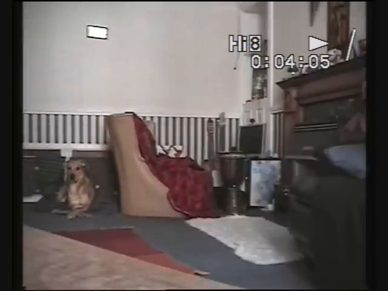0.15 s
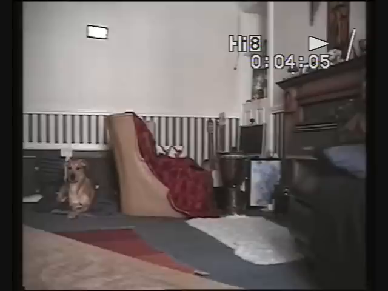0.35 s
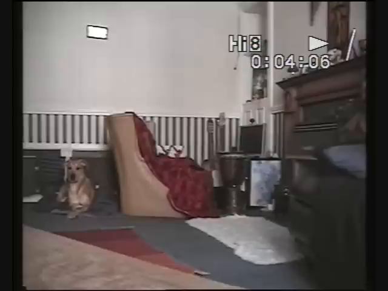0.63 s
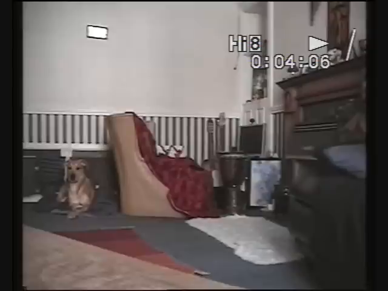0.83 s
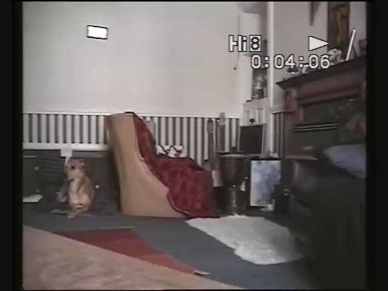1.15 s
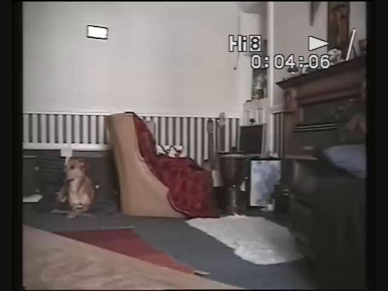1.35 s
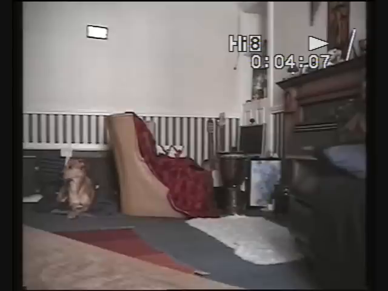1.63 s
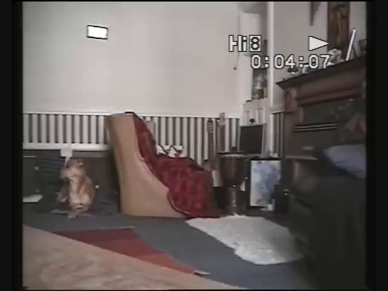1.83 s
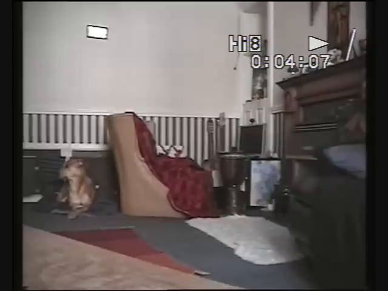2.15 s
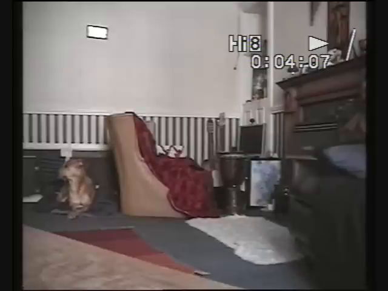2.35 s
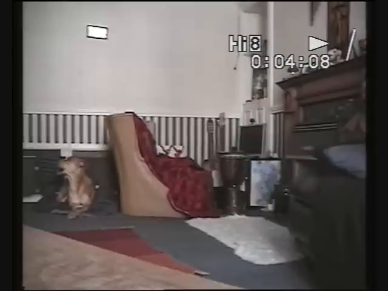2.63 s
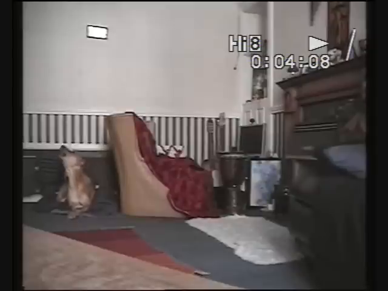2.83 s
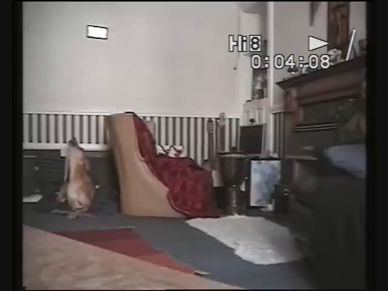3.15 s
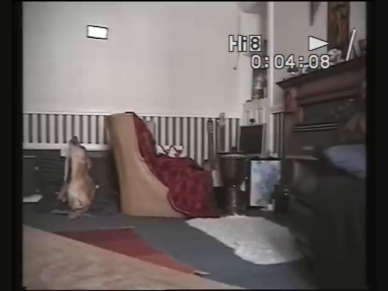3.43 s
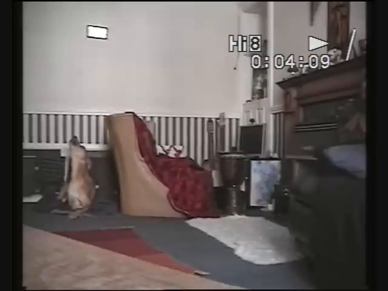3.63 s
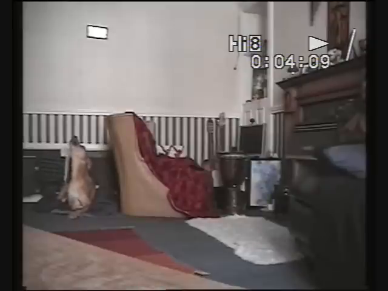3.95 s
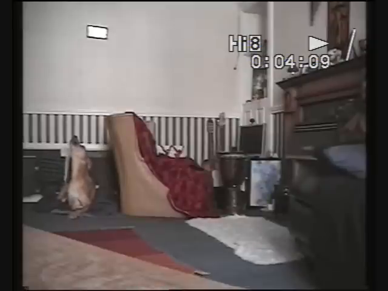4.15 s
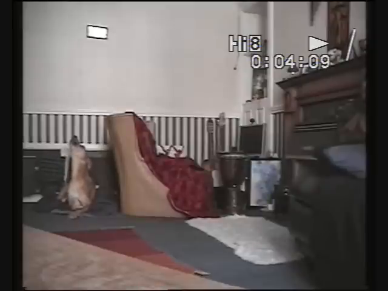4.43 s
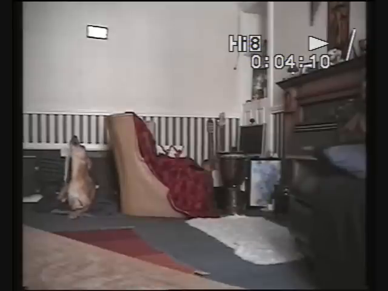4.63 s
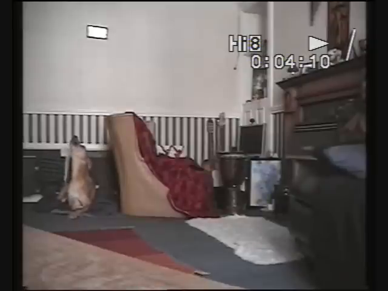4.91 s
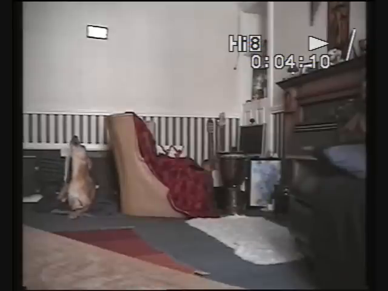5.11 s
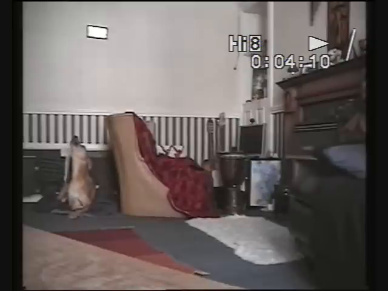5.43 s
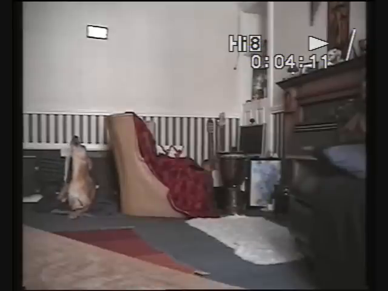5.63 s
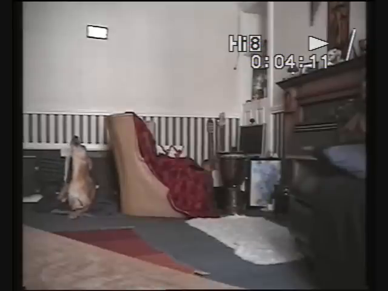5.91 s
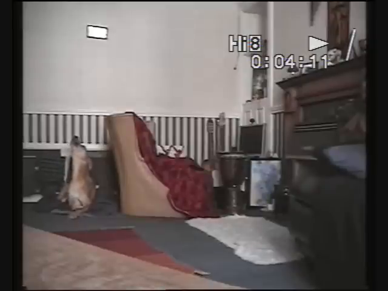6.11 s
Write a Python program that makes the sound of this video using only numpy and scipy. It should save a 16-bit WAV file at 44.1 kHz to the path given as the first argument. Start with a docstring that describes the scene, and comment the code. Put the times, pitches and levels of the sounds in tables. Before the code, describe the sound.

Two dogs howl together in a room after a few small whimpers, one wavering and swooping, the other holding a long sinking note.

```python
"""Two dogs howl together in a living room, picked up by the one microphone of a tape camcorder.
One whistles through its nose, yips and whimpers, then sings a low wavering howl that swoops and falls.
The other joins with a growl that rises to one long, slowly sinking note. Each voice is vocal folds and
breath, coloured by throat and muzzle. Behind them are faint ticks and the room's reflections.
The loudest swoops overload the tape; all sits on the right channel, over hiss and a high whine."""
import sys
import numpy as np
from scipy import signal
from scipy.fft import rfft, irfft, next_fast_len
from scipy.io import wavfile
from scipy.ndimage import uniform_filter1d

SR = 44100
rng = np.random.default_rng(int(sys.argv[2]) if len(sys.argv) > 2 else 0)


def waveform_to_disk(signal):
    """Save audio, clipped to [-1, 1], as 16-bit WAV at the path in sys.argv[1]."""
    frames = np.transpose(np.atleast_2d(signal))
    scaled = np.clip(frames, -1, 1) * 32767
    samples = np.round(scaled).astype(np.int16)
    wavfile.write(sys.argv[1], SR, samples)


N = 276811
TIME = np.arange(N) / SR

# the howls; brightness lifts the low overtones as the mouth opens:
# (time [s], pitch [Hz], effort [dB], brightness [dB])
WAVERING_HOWL = [(1.915, 326.3, -49, -9), (1.995, 337.8, -26.5, -1.5), (2.04, 316.8, -38, -1.5),
                 (2.09, 307.5, -15.5, -13.5), (2.15, 312.4, -18, -10.5), (2.2, 320.2, -20, -24.5),
                 (2.29, 322.7, -13, -15), (2.5, 324.6, -23, -6.5), (2.56, 349.8, -28, 5.5),
                 (2.62, 343.4, -26.5, -6), (2.68, 361.4, -21, -2.5), (2.76, 382.9, -30, 4),
                 (2.87, 399, -27.5, 9.5), (2.92, 374.5, -19.5, -7), (3.03, 344.5, -29.5, -20),
                 (3.1, 344.1, -14.5, -11.5), (3.42, 341.3, -15.5, -23), (3.49, 360.6, -26, 3),
                 (3.61, 424.7, -20, -1.5), (3.7, 456.6, -40.5, 0.5), (3.87, 515.5, -38, 27),
                 (3.94, 560, -27.5, -14), (4.0, 591.2, -26, -9.5), (4.15, 580.4, -29.5, 3),
                 (4.32, 595, -26, -1), (4.42, 576.3, -30.5, 16.5), (4.48, 537, -22.5, 1.5),
                 (4.57, 450.5, -21.5, 11.5), (4.7, 371.8, -23.5, -16), (4.92, 350.8, -36, -5),
                 (5.0, 384, -31, -9.5), (5.07, 363.6, -37, -3.5), (5.12, 360, -55, -10.5)]
LONG_HOWL = [(2.59, 269.4, -46, 2.5), (2.65, 257.2, -32, 1), (2.74, 248.0, -35.5, 4.5),
             (2.82, 299.0, -27.5, 0.5), (2.89, 369.5, -25.0, 7.5), (2.98, 517, -21.0, 5),
             (3.06, 506.3, -17, -2), (3.2, 510.4, -21, 4.5), (3.55, 509.8, -16.5, -5.5),
             (3.9, 491.6, -15.5, -8), (4.08, 481.9, -21.5, 0), (4.42, 468.5, -22.5, 6.5),
             (4.62, 463.2, -20, 0), (5.05, 448.2, -28.5, 8), (5.42, 449.9, -27.0, 4.5),
             (5.55, 440.7, -34, 12), (5.82, 440.5, -34, 12.5), (6.03, 423.1, -38, 9.5),
             (6.28, 394.6, -40, 13.5)]
# how far each of the first four harmonics follows the brightness: (share [ratio])
BRIGHT_SHARES = [0, 1, 0.73, 0.73]
# each dog's mouth and place in the room colour those four at the microphone: (frequency [Hz], gain [dB])
WAVERING_COLOUR = [(300.0, -30), (345.0, -15.0), (375.0, -9.5), (410.0, -3), (480.0, 2), (540.0, -2.5),
                   (650.0, 2.5), (690.0, -3), (730.0, 2), (830.0, -11.5), (1030.0, -17.5), (1130.0, -11.5),
                   (1290.0, -25), (1430.0, -30.5), (2300.0, -43.5)]
LONG_COLOUR = [(250.0, -15.5), (370.0, 1), (410.0, -3.5), (460.0, -4.5), (500.0, -12), (560.0, -18),
               (900.0, -32), (1030.0, -18), (1350.0, -32), (1550.0, -32.5), (2050.0, -44.5)]
# throat and muzzle above the fourth harmonic: (frequency [Hz], gain [dB])
WAVERING_THROAT = [(1600, -7), (1950, 3), (2250, -11), (2550, -18.5), (2920, -1), (3350, -25.5),
                   (4200, -28.5), (4900, -24.5), (5300, -8), (5900, -21), (6650, -11), (7300, -30),
                   (8100, -20), (9500, -40)]
LONG_THROAT = [(1500, 5), (2300, -10.5), (2600, 0), (2850, -3.5), (3130, 4.5), (3700, -23.5), (4600, -36.5),
               (5300, -27), (5800, -31), (6400, -24.5), (7250, -23.5), (7800, -10.5), (8400, -31.5),
               (11500, -30.5)]
# the treble, all harmonics above the fourth together: (time [s], level [dB])
WAVERING_TREBLE = [(1.92, -75), (1.99, -67.5), (2.089, -58.5), (2.249, -54.5), (2.45, -58), (2.619, -70),
                   (2.849, -60), (3.55, -62.5), (3.7, -70), (4.0, -70), (4.301, -62), (4.7, -59),
                   (4.93, -68.5), (5.12, -72.5)]
LONG_TREBLE = [(2.59, -73), (2.852, -71.5), (2.98, -49.5), (3.1, -54.5), (3.6, -54.5), (3.9, -63.5),
               (4.42, -59.5), (5.1, -67), (5.849, -70.5), (6.02, -61.5), (6.1, -77), (6.28, -81)]
# the jaw opens wide in two big swoops: (middle [s], half length [s], resonance [Hz], gain [dB])
YELPS = [(3.61, 0.059, 1307, 19), (4.53, 0.073, 1691, 26)]
# the long howl cracks, its folds repeating only every fourth cycle: (pitch multiple [ratio], gain [dB])
CRACK_LINES = [(.25, -26), (.75, 2.5), (1.25, 4.5), (1.5, -12.5), (1.75, -13), (2.25, -14.5), (2.5, -18)]
# the falling whimper: (time [s], pitch [Hz], effort [dB])
WHIMPER = [(1.21, 582, -69), (1.25, 600, -46), (1.29, 667, -54.5), (1.33, 565.7, -35),
           (1.405, 541.3, -42.5), (1.43, 538.7, -36), (1.49, 526.7, -32), (1.54, 527.7, -41),
           (1.59, 461, -32.5), (1.65, 405, -28), (1.72, 421, -50)]
# two short yips: (start [s], length [s], middle pitch [Hz], peak effort [dB])
YIPS = [(0.642, 0.11, 441, -41.5), (1.031, 0.067, 428, -38)]
# thin nose whistles: (start [s], length [s], top pitch [Hz], level [dB])
WHISTLES = [(0.297, .22, 3760, -77), (1.103, 0.26, 3670, -71.5)]
# faint ticks in the room: (time [s], level [dB])
TICKS = [(0.089, -56), (.425, -59.5), (0.592, -60), (.735, -54.5), (.925, -55), (.959, -59), (1.093, -53),
         (1.266, -49.5)]
# spectrum of a tick: (frequency [Hz], gain [dB])
TICK_COLOUR = [(300, -8), (900, -1), (1600, 6), (3000, -14), (7000, -12), (11000, -34)]
# the living room's ring: (frequency [Hz], time to fall 60 dB [s])
ROOM_DECAY = [(150, 0.058), (450, 0.51), (1000, 0.35), (8000, 0.15)]
# spectrum of the tape hiss: (frequency [Hz], gain [dB])
HISS_COLOUR = [(15, -10), (40, 1), (75, -7.5), (220, -6), (500, -11.5), (1500, -16.5), (2000, -18),
               (4200, -25.5), (5200, -23.5), (7500, -24), (9500, -30)]


def wavering_howl():
    """The first dog's howl: a brief rasp, then a wavering note with two open-jawed swoops."""
    out = np.zeros(N)
    t, *controls = howl_controls(WAVERING_HOWL, WAVERING_TREBLE, rasp_s=.072)
    _, sound = voice(t, *controls, WAVERING_COLOUR, WAVERING_THROAT,
                     jitter=.0045, flutter_hz=120, air_db=-13, yelps=YELPS)
    add(out, t[0], sound)
    return out


def long_howl(crack_at_s=3.0, crack_length_s=.45, crack_db=-28.5, fall_db_per_s=34):
    """The second dog's growl rises to a held note, which cracks into subharmonics, then runs clean."""
    out = np.zeros(N)
    t, *controls = howl_controls(LONG_HOWL, LONG_TREBLE, rasp_s=.17)
    cycles, sound = voice(t, *controls, LONG_COLOUR, LONG_THROAT, jitter=.003, flutter_hz=90, air_db=-9)
    crack = sum(amp(db) * np.cos(2 * np.pi * (k * cycles + rng.random())) for k, db in CRACK_LINES)
    age = np.clip(t - crack_at_s, 0, crack_length_s)
    envelope = amp(crack_db - fall_db_per_s * age) * fade(age, edge_s=.047) ** 2
    flicker = 1 + .12 * wander(len(t), 35)
    add(out, t[0], sound + np.sqrt(2) * crack * envelope * flicker)
    return out


def howl_controls(rows, treble, rasp_s):
    """Time, pitch, effort, brightness, treble and roughness: folds rasp at the onset and in glides."""
    t, (hz, effort_db, bright_db) = curves(rows)
    treble_db = np.interp(t, *np.transpose(treble))
    octaves_per_s = uniform_filter1d(abs(np.gradient(np.log2(hz))) * SR, size=1500)
    unsettled = 1 / (1 + ((t - t[0]) / rasp_s) ** 5)
    rough = np.clip(.025 + .85 * unsettled + .026 * octaves_per_s, 0, 1)
    return t, hz, effort_db, bright_db, treble_db, rough


def voice(t, hz, effort_db, bright_db, treble_db, rough, colour, throat,
          jitter, flutter_hz, air_db, yelps=()):
    """Vocal folds as a stack of harmonics, with breath; returns the count of cycles and the sound."""
    gains = [amp(effort_db + read(colour, k * hz) + bright_db * share + yelp_db(t, k * hz, yelps))
             for k, share in enumerate(BRIGHT_SHARES, 1)]
    # the pitch wavers slightly, and shakes when the voice is hoarse
    tremble = jitter * wander(len(t), 20.6) + .035 * rough * wander(len(t), 90)
    cycles = np.cumsum(hz * (1 + tremble)) / SR
    treble = [amp(read(throat, k * hz)) * (k * hz < 12000) for k in range(5, 29)]
    treble_gain = amp(treble_db) / np.sqrt(sum(g ** 2 for g in treble))
    # the short waves of the high harmonics swell and fade at the microphone as the head moves
    gains += [g * treble_gain * amp(2 * wander(len(t), 28)) for g in treble]
    folds = sum(g * np.cos(2 * np.pi * (k * cycles + rng.random())) for k, g in enumerate(gains, 1))
    # uneven cycles spread each harmonic into a band
    folds = np.sqrt(2) * folds * (1 + rough * wander(len(t), flutter_hz)) / np.sqrt(1 + rough ** 2)
    # air escapes in a puff each cycle and passes the same throat
    puffs = rng.standard_normal(len(t)) * (1 + np.cos(2 * np.pi * cycles))
    air = coloured(puffs, [(200, -24.5), (600, -11.5)] + throat)
    return cycles, (folds + amp(treble_db + air_db) * air) * fade(t)


def yelp_db(t, hz, yelps, width_octaves=.24):
    """Lift that the wide open mouth gives a harmonic passing its resonance."""
    return sum(db * np.exp(-((t - s) / half) ** 4 - (np.log2(hz / centre) / width_octaves) ** 2)
               for s, half, centre, db in yelps)


def whimper_and_yips(yip_rise=.166, yip_edge_db=-26.5):
    """The first dog's small cries, mouth nearly shut; each yip slides up as it swells and fades."""
    out = np.zeros(N)
    cries = [curves(WHIMPER)]
    for start, length, hz, db in YIPS:
        t = np.arange(0, length, 1 / SR)
        from_middle = t / length - .5
        pitch = hz * (1 + yip_rise * from_middle)
        effort_db = db + yip_edge_db * 2 * abs(from_middle)
        cries.append((start + t, (pitch, effort_db)))
    for t, (hz, effort_db) in cries:
        _, sound = voice(t, hz, effort_db, bright_db=-8.5, treble_db=-55.5 + effort_db / 2, rough=.053,
                         colour=WAVERING_COLOUR, throat=WAVERING_THROAT,
                         jitter=.009, flutter_hz=90, air_db=0)
        add(out, t[0], sound)
    return out


def nose_whistles(sag=.061, edge_db=-14):
    """The first dog whistles through its nose; pitch and level arch up from both ends."""
    out = np.zeros(N)
    for start, length, top_hz, db in WHISTLES:
        t = np.arange(0, length, 1 / SR)
        edge = (2 * t / length - 1) ** 2
        hz = top_hz * (1 - sag * edge) * (1 + .0013 * wander(len(t), 60))
        phase = 2 * np.pi * np.cumsum(hz) / SR
        tone = np.sin(phase) + amp(-5) * np.sin(2 * phase)
        add(out, start, np.sqrt(2) * amp(db + edge_db * edge) * tone * fade(t))
    return out


def ticks(decay_s=.0068):
    """Small ticks of noise in the room before the howling starts."""
    out, t = np.zeros(N), np.arange(SR // 16) / SR
    for s, db in TICKS:
        noise = coloured(rng.standard_normal(len(t)), TICK_COLOUR)
        add(out, s, amp(db) * np.exp(-t / decay_s) * noise)
    return out


def living_room(direct, gap_s=.011, wet_db=-12.5):
    """Reflections off walls and furniture follow the direct sound, each band dying at its own speed."""
    hz, t, bands = signal.stft(rng.standard_normal(SR // 2), SR, nperseg=256)
    decay = amp(-60 * t / read(ROOM_DECAY, hz)[:, None])
    _, tail = signal.istft(bands * decay, SR, nperseg=256)
    tail *= np.clip(np.arange(len(tail)) / SR / gap_s - 1, 0, 1)
    # with muzzles raised, more treble than bass reaches the microphone by way of the ceiling
    ceiling_db = read([(600, -1.5), (1000, 4), (2500, 10.5)], np.fft.rfftfreq(len(tail), 1 / SR))
    tail = irfft(rfft(tail / np.linalg.norm(tail)) * amp(ceiling_db))
    return direct + amp(wet_db) * signal.fftconvolve(direct, tail)[:N]


def tape_overload(x, limit=.22, steepest_per_sample=.013):
    """The tape squashes peaks; loud, steep waves strain it into low rumble and a soft rasp."""
    squashed = x / (1 + (x / limit) ** 8) ** (1 / 8)
    strain = np.minimum(uniform_filter1d(np.gradient(x) ** 2, size=1300) / steepest_per_sample ** 2, 1)
    sputter = strain ** 3.5 * rng.standard_normal(N)
    rumble = amp(-16) * lowpass(sputter, hz=78)
    rasp = amp(-44) * lowpass(sputter, hz=3200)
    return squashed + rumble + rasp


def scan_whine(line_hz=15625, fields_per_s=50, ring_s=.0004):
    """The camcorder's line rate leaks in as a high whine, with a short burst at every field."""
    carrier = np.sqrt(2) * np.sin(2 * np.pi * line_hz * TIME)
    age = TIME % (1 / fields_per_s) / ring_s
    bursts = unit(np.sqrt(age) * np.exp(-age) * (1 + .25 * wander(N, 25)))
    return carrier * (amp(-66) - amp(-68) * bursts)


def tape_hiss(level_db=-62):
    """The tape's steady noise floor."""
    return amp(level_db) * coloured(rng.standard_normal(N), HISS_COLOUR)


def amp(db):
    """Decibels to gain."""
    return 10 ** (np.asarray(db) / 20)


def unit(x):
    """Scales to rms 1."""
    return x / np.sqrt(np.mean(abs(x) ** 2) + 1e-20)


def read(points, hz):
    """Reads a spectrum table on a log-frequency axis."""
    f, value = np.transpose(points)
    return np.interp(np.log(hz + 1), np.log(f + 1), value)


def add(mix, s, sound):
    """Mixes a sound in at time s."""
    part = mix[max(round(s * SR), 0):][:len(sound)]
    part += sound[:len(part)]


def coloured(x, points):
    """Gives a sound the spectrum of a table, at rms 1."""
    size = next_fast_len(len(x))
    gain = amp(read(points, np.fft.rfftfreq(size, 1 / SR)))
    return unit(irfft(rfft(x, size) * gain, size)[:len(x)])


def lowpass(x, hz):
    """Second-order treble cut."""
    return signal.sosfilt(signal.butter(2, hz, fs=SR, output="sos"), x)


def wander(size, rate_hz):
    """Smooth random motion of rms 1."""
    return unit(lowpass(rng.standard_normal(size), rate_hz))


def curves(rows):
    """Sample times over a table's span, and its columns joined by straight lines."""
    s, *columns = np.transpose(rows)
    t = np.arange(s[0], s[-1], 1 / SR)
    return t, [np.interp(t, s, c) for c in columns]


def fade(t, edge_s=.007):
    """Soft start and stop."""
    return np.clip(np.minimum(t - t[0], t[-1] - t) / edge_s, 0, 1)


def scene():
    """Both dogs in the living room, at one microphone."""
    first_dog = nose_whistles() + whimper_and_yips() + wavering_howl()
    return living_room(first_dog + long_howl() + ticks())[None]


def record(dry, left_db=-28, edge_hz=15800, dc_offset=-.00097):
    """The microphone feeds the tape's right channel; the left holds only a trace of hiss and whine."""
    right_hiss, left_hiss = tape_hiss(), tape_hiss()
    whine = scan_whine()
    left = amp(left_db) * (left_hiss + whine)
    right = tape_overload(dry[0]) + right_hiss + whine
    band_limit = signal.firwin(1023, edge_hz, window=("kaiser", 9), fs=SR)
    return dc_offset + signal.oaconvolve(np.array([left, right]), band_limit[None], "same", axes=1)


dry = scene()
out = record(dry)
waveform_to_disk(out)
```